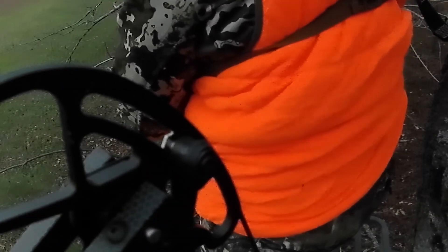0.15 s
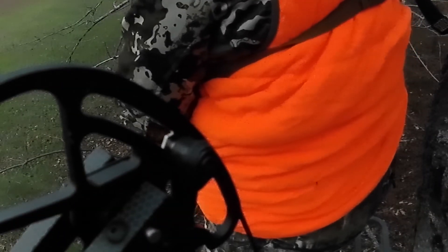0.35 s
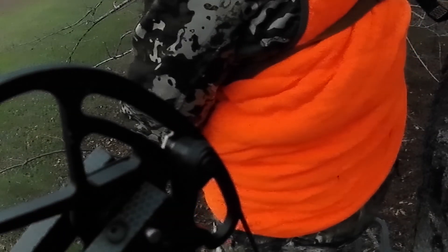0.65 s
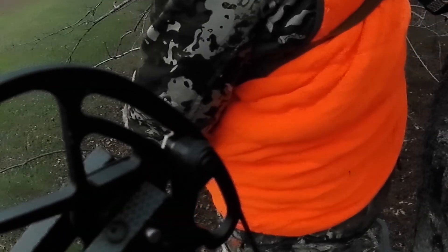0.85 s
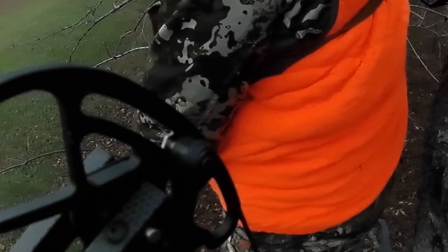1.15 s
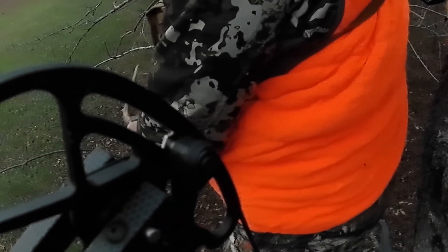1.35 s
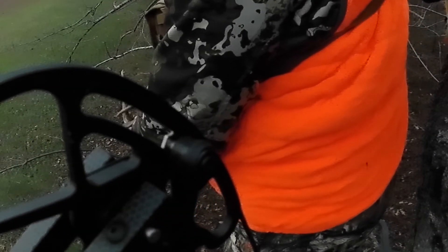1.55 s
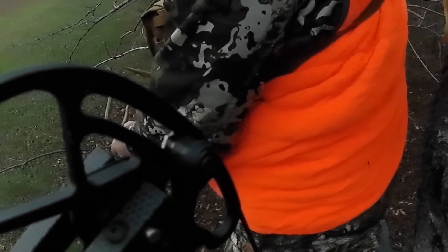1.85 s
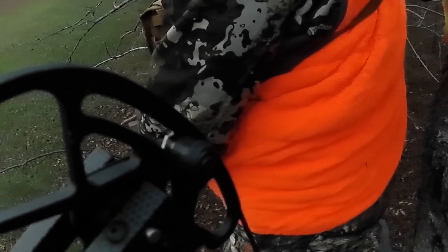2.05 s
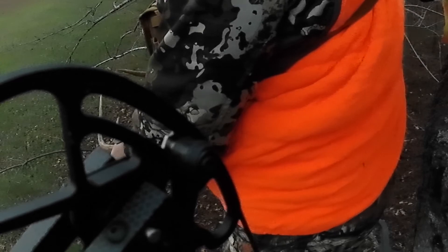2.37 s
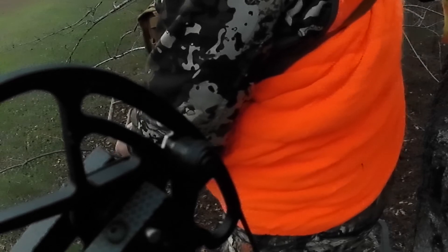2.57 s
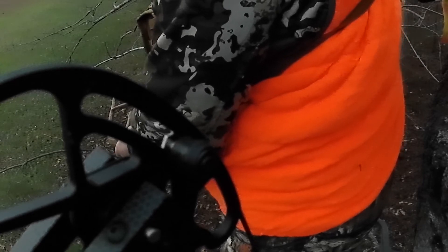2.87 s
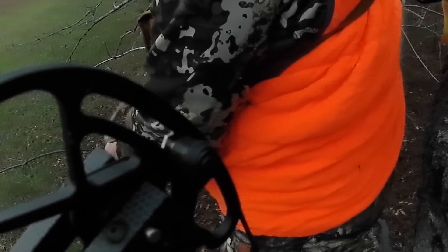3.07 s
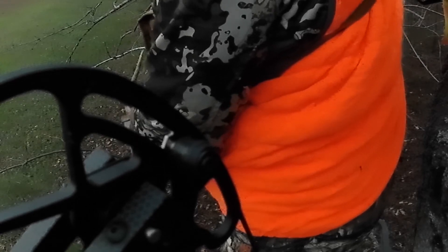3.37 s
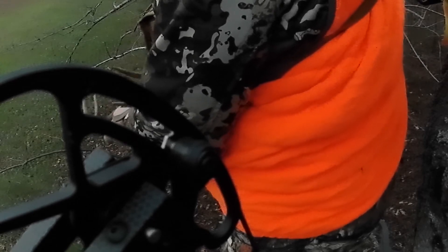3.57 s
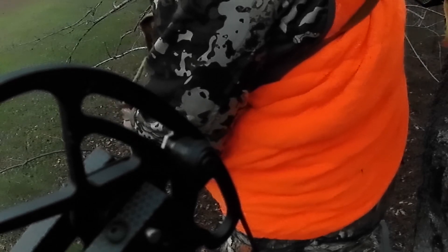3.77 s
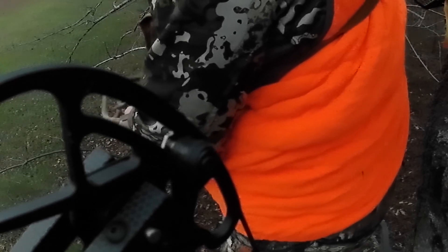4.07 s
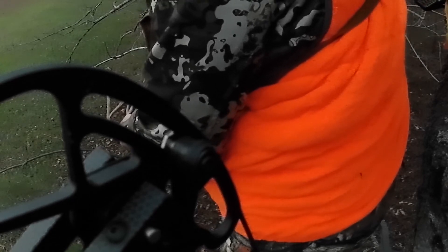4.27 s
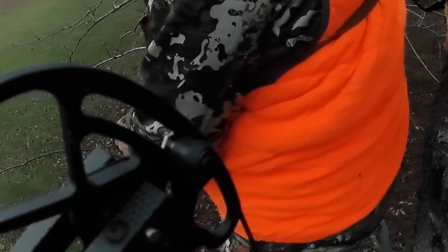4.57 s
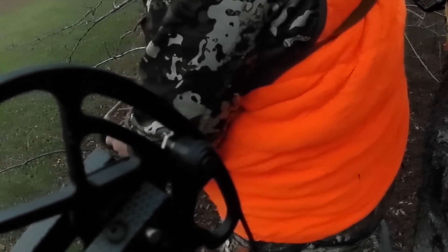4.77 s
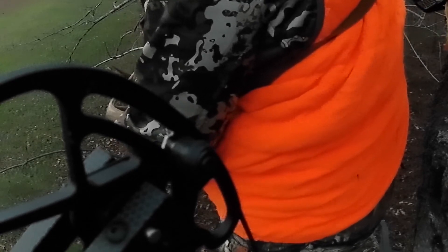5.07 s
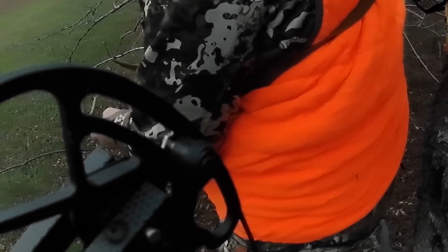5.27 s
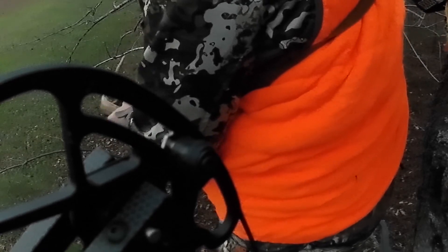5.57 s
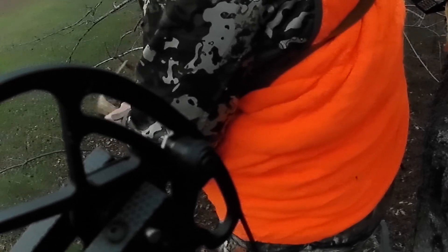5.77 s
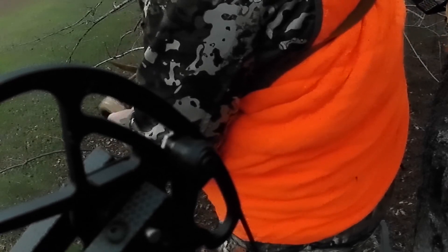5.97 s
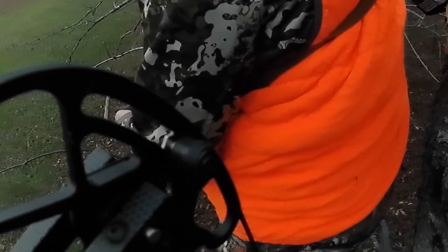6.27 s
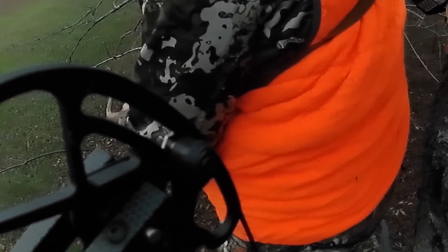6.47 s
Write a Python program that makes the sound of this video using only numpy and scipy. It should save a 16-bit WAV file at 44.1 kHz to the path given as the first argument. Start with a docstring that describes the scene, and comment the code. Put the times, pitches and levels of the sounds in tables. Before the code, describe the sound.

Two hard antlers are knocked and ground together by hand, close to the microphone, in quiet woods. Bright tine clicks and woody beam knocks come in irregular bursts, each skidding into a tiny rasp. Gaps of up to most of a second separate the early flurries; later they crowd closer. Trees return short, soft noisy tails over very faint air hiss.

```python
"""Two deer antlers are clashed and ground together by hand, close by, in a faint hiss of still air.
From a first quick flurry on, thin tines click and thick beams knock, each contact ringing damped bone modes.
Every contact skids on briefly, and here and there the knobbly beams drag along each other in random slips.
About halfway through, two freed tines sing on as fuzzy bands that sag in pitch.
All along, the trunks of the wood scatter the sound into short, soft noise tails of varying level."""
import sys
import numpy as np
from scipy import signal
from scipy.fft import rfft, irfft, next_fast_len
from scipy.io import wavfile
from scipy.ndimage import uniform_filter1d, minimum_filter1d

SR = 44100
rng = np.random.default_rng(int(sys.argv[2]) if len(sys.argv) > 2 else 0)


def waveform_to_disk(signal):
    """Save audio, clipped to [-1, 1], as 16-bit WAV at the path in sys.argv[1]."""
    frames = np.transpose(np.atleast_2d(signal))
    scaled = np.clip(frames, -1, 1) * 32767
    samples = np.round(scaled).astype(np.int16)
    wavfile.write(sys.argv[1], SR, samples)


N = 292383

# blows of antler on antler: (time [s], strength [dB], heft = main beam's level re strength [dB],
# edge = crack's level re strength [dB], strongest resonance of the struck spot [Hz])
CONTACTS = [(0.2237, -20, -19, -11, 4240), (0.233, -15, -22, -9.5, 4160), (0.2509, -16, -19.5, -9.5, 4390),
            (0.2768, -28.0, -4, -13, 2880), (0.289, -15.0, -16, -14.5, 1296), (0.793, -42, -3, -34, 1530),
            (1.1161, -13, -14, -8.5, 4260), (1.1716, -21, -10, -10, 3880),
            (1.1783, -16.5, -11.5, -12, 2670), (1.3826, -41, -26.5, -27, 2510),
            (1.554, -13.5, -34.5, -9.5, 4170), (1.5847, -11.5, -15.5, -9, 4700),
            (1.5902, -18, -15, -11, 3570), (1.5997, -11, -17, -11.5, 2700), (1.6143, -18, -19, -14.5, 3920),
            (1.7859, -25.0, -26.5, -8, 3850), (1.8126, -25.5, -9.5, -23, 3640),
            (1.8764, -34, -17.5, -14, 1790), (1.9913, -8, -26.5, -16, 3680),
            (2.0648, -20, -8.5, -17.5, 2820), (2.0714, -12.5, -8, -13, 763),
            (2.238, -25, -8.5, -40.5, 1280), (2.4716, -13, -15.5, -7, 4190),
            (2.4885, -25, -10.5, -12, 4200), (2.506, -14.5, -24.5, -9, 4140),
            (2.5162, -14.0, -34.5, -7, 3790), (2.5232, -21, -24.5, -10.5, 4460),
            (3.3345, -15, -23.5, -2.5, 4450), (3.354, -22.5, -22, -17, 1910),
            (3.39, -10, -30.5, -14.5, 3700), (3.438, -20.5, -13, -17, 1320),
            (3.5127, -13, -23.5, -11.5, 3740), (3.5357, -22.5, -25, -20, 4260),
            (3.5446, -28, -27.5, -7, 4580), (3.7142, -13.5, -40.5, -8, 4380),
            (3.7211, -18.0, -39.5, -9.5, 4400), (3.7694, -8.5, -29, -26, 1690),
            (3.8872, -10.0, -27, -17, 2370), (4.1126, -14.5, -31, -10, 4130),
            (4.1532, -8.5, -23.5, -10.5, 4510), (4.1628, -17.5, -22, -10.5, 4040),
            (4.1771, -19.5, -22.5, -9.5, 3670), (4.5353, -15.5, -25.5, -7.5, 2920),
            (4.5505, -18, -27, -14.5, 2600), (4.8616, -18, -23, 0.5, 5540), (4.8695, -17.5, -25, -18, 3990),
            (4.8776, -7.5, -23, -14, 4080), (5.024, -15, -26, -12, 4130), (5.2024, -42.5, -25, -17, 4440),
            (5.2719, -18, -36, -4, 4100), (5.2864, -25, -28.5, -13.5, 4130),
            (5.4459, -21.5, -30, -3.5, 4640), (5.4622, -20.5, -38, -6, 4240),
            (5.4968, -18, -34.5, -12.5, 2280), (5.5896, -25.5, -50.5, -1, 4660),
            (5.6062, -28, -39, -7, 4560), (5.6188, -14, -43.5, -11, 1860),
            (5.6371, -23, -42.5, -12.5, 2770), (5.8329, -25.5, -45.5, -17, 4100),
            (5.8713, -6, -24.5, -13.5, 2480), (5.881, -10.5, -21.5, -14.5, 4480),
            (6.0076, -17.0, -37.5, -7, 3800), (6.0418, -26, -21, -13.5, 4230),
            (6.0817, -30, -29, -22, 4340), (6.184, -12.5, -27.5, -11.5, 4180),
            (6.1898, -16.5, -16.5, -8.5, 2240), (6.3285, -42.5, -14.5, -33, 4040),
            (6.4819, -19, -32, -0.5, 4020), (6.4915, -18.5, -27, -10.5, 2620),
            (6.5093, -9.5, -22.5, -14, 4290), (6.59, -12.5, -30.5, -10, 2800),
            (6.599, -17.5, -20.5, -10, 2020), (6.6132, -19.5, -22.5, -14, 3260)]
# borders of the bands where beam, forks, tines and crack sound: (frequency [Hz])
PART_EDGES = [290, 1100, 3000, 5500, 11200]
# dense, unresolved ringing of a contact: (frequency [Hz], relative density [dB per Hz])
CRACK_COLOUR = [(200, -24), (500, -6), (1200, 7), (4300, 17.5), (6000, -7), (8000, 0), (10000, -19),
                (12000, -27), (15000, -39)]

USUAL_HEFT_DB = -20  # heft of an ordinary contact
ATTACK_S = .008  # a contact's level is its rms over this first stretch


def amp(db):
    """Decibels to gain."""
    return 10 ** (np.asarray(db) / 20)


def unit(x):
    """Each row at rms 1."""
    return x / np.sqrt(np.mean(x ** 2, axis=-1, keepdims=True) + 1e-20)


def along(points, hz):
    """(Hz, value) points read on a log frequency axis."""
    f, v = np.transpose(points)
    return np.interp(np.log(hz + 1), np.log(f + 1), v)


def filtered(x, response):
    """x shaped by a gain given as a function of frequency in Hz."""
    n = x.shape[-1]
    m = next_fast_len(n + 2048)
    spectrum = rfft(x, m) * response(np.fft.rfftfreq(m, 1 / SR))
    return irfft(spectrum, m)[..., :n]


def noise(spectrum, shape):
    """Coloured noise of rms 1."""
    return unit(filtered(rng.standard_normal(shape), lambda hz: amp(along(spectrum, hz))))


def fade(t, t60):
    """Exponential decay by 60 dB in t60 seconds."""
    return np.exp(-np.log(1000) * t / t60)


def add(track, s, sound):
    """Mix a sound into the track at time s."""
    room = track[max(round(s * SR), 0):][:len(sound)]
    room += sound[:len(room)]


def clacks(crack_db=10, crack_t60=0.012, chatter_db=-5, chatter_t60=0.055,
           spot_db=17, spot_cycles=70, spot_longest_s=0.044, beam_db=-3, beam_cycles=30,
           tick_db=9, rebound_db=-9, rebound_s=.003):
    """Each contact is a tick, a crack and ringing bone; it rebounds at once, then is levelled band by band."""
    # each new grip sets the main beam's deepest strong note: (time [s], frequency [Hz])
    grips = [(0, 768), (1.05, 299), (1.145, 762), (1.94, 315), (2.03, 775), (2.4, 481), (3.2, 780),
             (3.65, 498)]
    grip_s, grip_hz = np.transpose(grips)
    rows = np.array(CONTACTS)
    time_s, spot_hz = rows[:, [0]], rows[:, [-1]]
    t = np.arange(SR // 14) / SR

    dense = amp(crack_db) * fade(t, crack_t60) + amp(chatter_db) * fade(t, chatter_t60)
    crack = dense * noise(CRACK_COLOUR, (len(rows), len(t)))
    ring = ringing(t, len(rows), spread_db=5.5, detune=0.013)
    # bone gives a little, so the ring builds just behind the hard surface's tick
    build = 1 - np.exp(-t / .0002)
    tick = noise(CRACK_COLOUR, ring.shape) * fade(t, .005)
    blow = build * (ring + crack) + amp(tick_db) * tick

    flights = rebound_s * rng.uniform(.5, 1, len(rows))
    rebounds = [np.interp(t - flight, t, first, left=0) for flight, first in zip(flights, blow)]
    blow += amp(rebound_db) * np.array(rebounds)

    # the hand damps the struck spot, so its t60 has an upper limit
    damped_cycles = np.minimum(spot_cycles, spot_longest_s * spot_hz)
    blow += amp(spot_db) * build * resonance(t, spot_hz, damped_cycles)
    beam_hz = grip_hz[np.searchsorted(grip_s, time_s) - 1]
    blow += amp(beam_db) * build * resonance(t, beam_hz, beam_cycles)

    attack = t < ATTACK_S
    levels = shares()
    sounds = 0
    for k in range(len(PART_EDGES) - 1):
        band = signal.butter(4, PART_EDGES[k:k + 2], "band", fs=SR, output="sos")
        part = signal.sosfilt(band, blow)
        sounds = sounds + amp(levels[:, [k]]) * part / part[:, attack].std(axis=1, keepdims=True)
    track = np.zeros(N)
    for s, sound in zip(rows[:, 0], sounds):
        add(track, s, sound)
    return track


def shares(fork_db=-9, tine_db=-4, fork_db_per_octave=-2.5, tine_db_per_octave=3,
           heft_fills=.15, usual_spot_hz=3000):
    """Beam, fork, tine and crack levels in dB: higher spots favour tines over forks; heft fills the forks."""
    _, db, heft_db, edge_db, spot_hz = np.transpose(CONTACTS)
    octaves = np.log2(spot_hz / usual_spot_hz)
    forks = fork_db + fork_db_per_octave * octaves + heft_fills * (heft_db - USUAL_HEFT_DB)
    tines = tine_db + tine_db_per_octave * octaves
    return (db + np.array([heft_db, forks, tines, edge_db])).T


def ringing(t, count, spread_db, detune):
    """Bone modes, a row per contact: the place of the blow sets their strengths, the grip shifts them a little."""
    # hand-held antler: (centre frequency [Hz], relative level [dB], t60 before any extra damping [s])
    bone_modes = [(308, -19.5, 0.053), (499, -20, 0.072), (633.6, -6, 0.092), (779.7, -3, 0.08),
                  (905, -7, 0.038), (1003, -13.5, 0.11), (1285.5, 1, 0.055), (1508, 2, 0.044),
                  (1641, 5, 0.046), (1846, 9, 0.045), (2108, 14, 0.024), (2288, 5, 0.072), (2524, 8, 0.022),
                  (2800, 4.5, 0.025), (3375, -2, 0.02), (3800, 6.5, 0.011), (4112, 6.5, 0.025),
                  (4419, 8.5, 0.014), (5020, -8, 0.0073), (5127, 2.5, 0.0068), (6150, 4.5, 0.0052),
                  (6880, -10, 0.0075), (7070, -3, 0.005), (7220, -10, 0.0039)]
    hz, db, t60 = np.transpose(bone_modes)
    strength, shift, side = rng.standard_normal((count, 3, len(hz))).transpose(1, 0, 2)
    gain = amp(db + spread_db * strength) * np.sign(side)
    pitch = hz * (1 + detune * shift)
    rows = np.zeros((count, len(t)))
    for k in range(len(hz)):
        rows += gain[:, [k]] * np.sin(2 * np.pi * pitch[:, [k]] * t) * fade(t, t60[k])
    return rows


def resonance(t, hz, cycles):
    """One bone mode that falls by 60 dB in so many cycles."""
    return np.sin(2 * np.pi * hz * t) * fade(t, cycles / hz)


def scrapes(strokes, swell, slip_rate, size_db, trim_db, grit_db=13, spot_db=5, spot_cycles=40,
            tilt=1.0, focus_db=6.5, focus_octaves=0.52, press_power=0.71):
    """Knobs catch and slip at random, each slip a tiny blow on bone; the rasp centres on the rubbed spot's note.

    swell is the share of the stroke before full pressure, slip_rate is in slips per second."""
    # colour of the scraping before focus and tilt: (frequency [Hz], relative density [dB per Hz])
    rasp_colour = [(150, -49), (400, -11.5), (700, 1.5), (1200, -2.5), (2300, -4), (4300, 1), (6000, -2),
                   (9000, -23), (13000, -40)]
    grit_t60, middle_hz = .014, 2500
    track, t = np.zeros(N), np.arange(SR // 20) / SR
    for start, end, db, spot_hz in strokes:
        u = np.linspace(0, 1, max(round((end - start) * SR), len(t) // 10))
        pressure = np.interp(u, [0, swell, 1], [0, 1, 0]) ** press_power
        # uniform spread in dB with standard deviation size_db, random polarity
        sizes = amp(size_db * rng.uniform(-np.sqrt(3), np.sqrt(3), len(u))) * rng.choice([-1, 1], len(u))
        slips = (rng.random(len(u)) < slip_rate / SR) * sizes * pressure

        bone = ringing(t, 1, spread_db=2, detune=0.027)[0] * fade(t, 0.024)
        bone += amp(spot_db) * resonance(t, spot_hz, spot_cycles)
        grit = amp(grit_db) * fade(t, grit_t60) * rng.standard_normal(len(t))
        slope = tilt * np.log(spot_hz / middle_hz)  # higher spots rasp brighter

        def colour(hz):
            """Rasp gain with a broad peak at the rubbed spot's note."""
            focus = focus_db * np.exp(-(np.log2((hz + 1) / spot_hz) / focus_octaves) ** 2)
            return amp(along(rasp_colour, hz) + focus) * (1 + hz / middle_hz) ** slope

        rasp = filtered(signal.fftconvolve(slips, bone + grit), colour)
        add(track, start, amp(db + trim_db) * rasp / (rasp[:len(u)].std() + 1e-9))
    return track


def skids(length_s=.03, under_blow_db=-18, db_per_heft_db=0.47):
    """Every contact slides on over the same spot, harder with heft; levels stand before the rubbing's trim."""
    strokes = []
    for s, db, heft_db, _, spot_hz in CONTACTS:
        level_db = db + under_blow_db + db_per_heft_db * (heft_db - USUAL_HEFT_DB)
        strokes.append((s, s + length_s, level_db, spot_hz))
    return strokes


def singing():
    """A freed tine's lingering ring is a fuzzy band of close modes, read ever more slowly so its pitch sags."""
    # tines singing on after a blow:
    # (time [s], starting pitch [Hz], starting level [dB], t60 [s], sag [share of pitch per s])
    free_tines = [(3.512, 1660, -43.5, 0.5, 0.05), (3.888, 2430, -37.5, 0.58, .5)]
    track, t = np.zeros(N), np.arange(SR // 2) / SR
    for s, pitch, db, t60, sag in free_tines:
        band = filtered(rng.standard_normal(len(t)), lambda hz: np.exp(-((hz / pitch - 1) / .09) ** 2))
        sagging = np.interp(t - sag * t ** 2 / 2, t, band)
        add(track, s, amp(db) * unit(sagging) * fade(t, t60))
    return track


def smooth_pulses():
    """Summed over all directions no mode stands out: each part of a contact feeds the tail as one smooth pulse."""
    s = np.transpose(CONTACTS)[0]
    sizes = amp(shares().T) * np.sqrt(ATTACK_S * SR)  # the energy of the attack in one sample
    track = np.zeros(N)
    for size, lo, hi in zip(sizes, PART_EDGES, PART_EDGES[1:]):
        def band(hz):
            """Crack colour within the part's borders."""
            offset = (hz ** 2 - lo * hi) / ((hz + 1) * (hi - lo))
            return unit(amp(along(CRACK_COLOUR, hz)) / np.sqrt(1 + offset ** 8))

        pulses = np.bincount(np.round(s * SR).astype(int), size, N)
        track += filtered(pulses, band)
    return track


def woods(x, build_s=0.0096, patchy_db=3.5):
    """Trunks and ground scatter the sound into noise tails, a new one for each tenth of a second."""
    # how long the trees answer: (frequency [Hz], t60 [s])
    tree_decay = [(200, 0.0066), (600, 0.17), (1400, 0.19), (2300, 0.32), (3700, 0.31), (6000, 0.28),
                  (10000, 0.18)]
    # colour of their answer: (frequency [Hz], relative level [dB])
    tree_colour = [(200, 0), (700, 5.5), (2200, -1.5), (4000, -8), (7000, -4), (12000, 1.5)]
    step = SR // 10
    pieces = np.pad(x, (0, -N % step)).reshape(-1, step)
    hz, t, z = signal.stft(rng.standard_normal((len(pieces), SR // 2)), SR, nperseg=256)
    decay = fade(t, along(tree_decay, hz)[:, None])
    build = 1 - np.exp(-(t / build_s) ** 2)
    shape = amp(along(tree_colour, hz))[:, None] * decay * build
    # single trunks answer in patches of frequency and time
    patches = uniform_filter1d(rng.standard_normal(z.shape), size=8, axis=1)
    patches = unit(uniform_filter1d(patches, size=5, axis=2))
    tails = signal.istft(z * shape * amp(patchy_db * patches), SR, nperseg=256)[1]
    tails /= np.linalg.norm(tails, axis=1, keepdims=True)
    track = np.zeros(N)
    for k, echo in enumerate(signal.fftconvolve(pieces, tails, axes=1)):
        add(track, k * step / SR, echo)
    return track


def still_air(level_db=-62.5):
    """Still air and hiss: steady coloured noise."""
    # (frequency [Hz], relative density [dB per Hz])
    air_colour = [(15, -58), (25, -30), (117, -11.5), (263, -10), (301, -5), (344, -8), (416, -6),
                  (641, -6), (1160, -6.5), (1480, -7.5), (1740, -5.5), (5570, -11.5), (16000, -19.5)]
    return amp(level_db) * noise(air_colour, N)


def scene():
    """Antlers close by, their echo from the trees, and the faint air."""
    # beam dragged along beam: (start [s], end [s], level before trim [dB], strongest resonance [Hz])
    drags = [(0.229, 0.33, -26, 4230), (0.787, 0.864, -42, 1650), (0.848, 0.91, -34.5, 4220),
             (1.361, 1.411, -43, 2550), (1.738, 1.807, -45, 1000), (1.788, 1.892, -33, 3660),
             (2.235, 2.286, -35.5, 1294), (2.98, 3.047, -55, 3320), (3.113, 3.159, -55.5, 2700),
             (3.396, 3.47, -32, 2730), (3.709, 3.744, -27, 4340), (3.89, 3.955, -32.5, 4270),
             (4.115, 4.15, -29.5, 1910), (4.47, 4.53, -43.5, 2300), (5.004, 5.061, -25, 4090),
             (5.465, 5.522, -29.5, 2283), (5.84, 5.898, -32, 1900), (5.999, 6.044, -28.5, 4110),
             (6.182, 6.222, -25.5, 2320), (6.488, 6.559, -26.5, 2420)]
    # level of the soft noise tail over time, set on the sound that feeds it: (time [s], level [dB])
    tail_levels = [(0.25, -13), (1.6, -14.5), (2.3, -16), (3.45, -14.5), (4.15, -10), (4.55, -13.5),
                   (5.5, -16), (6.2, -14)]
    dragging = scrapes(drags, swell=0.46, slip_rate=800, size_db=4, trim_db=-2)
    skidding = scrapes(skids(), swell=.1, slip_rate=800, size_db=4, trim_db=-2)
    rubbing = dragging + skidding
    tail_gain = amp(np.interp(np.arange(N) / SR, *np.transpose(tail_levels)))
    echo = woods(tail_gain * (smooth_pulses() + rubbing))
    return (clacks() + rubbing + singing() + echo + still_air())[None]


def record(dry, ceiling=.97, top_hz=16000):
    """A fast look-ahead limiter eases peaks down to the ceiling; then all above the band limit is cut."""
    needed = ceiling / np.maximum(np.abs(dry), ceiling)
    held = minimum_filter1d(needed, size=49)
    gain = uniform_filter1d(uniform_filter1d(held, size=25), size=25)
    return filtered(dry * gain, lambda hz: hz < top_hz)


dry = scene()
out = record(dry)
waveform_to_disk(out)
```